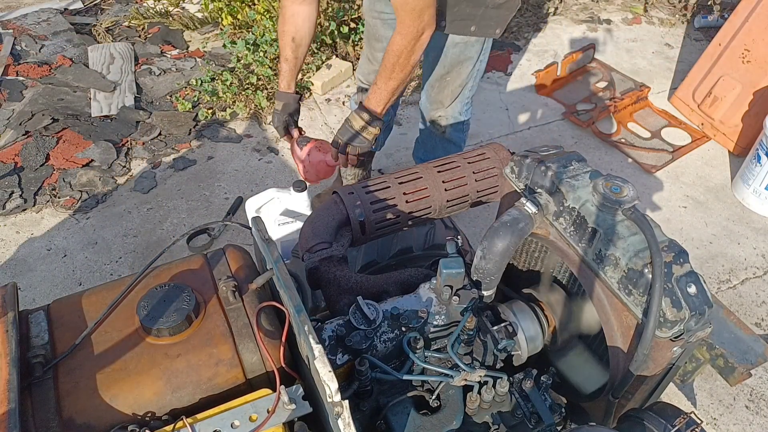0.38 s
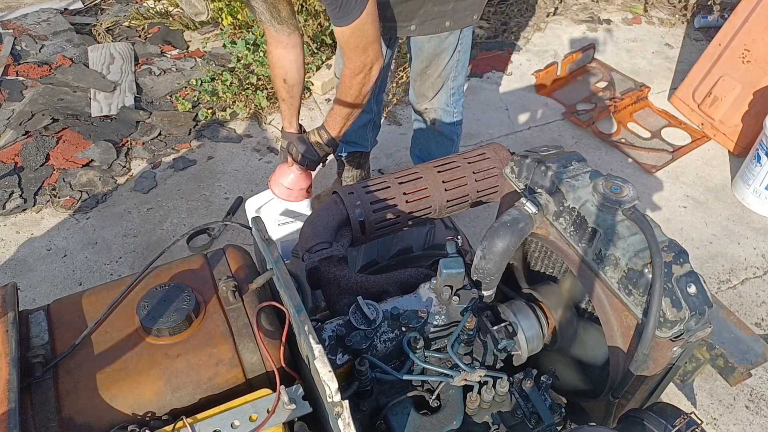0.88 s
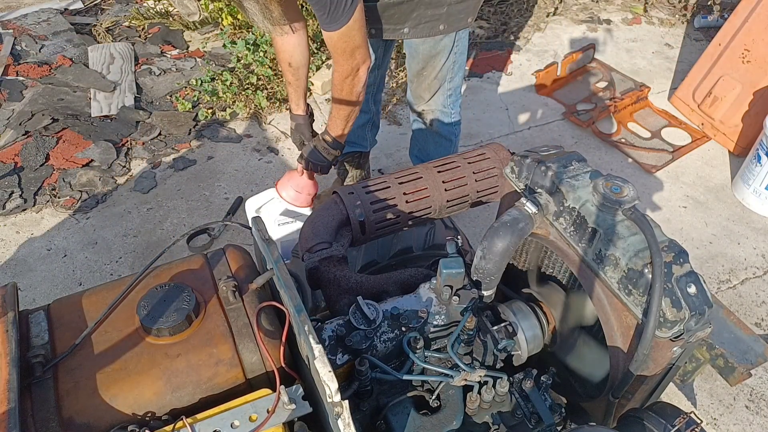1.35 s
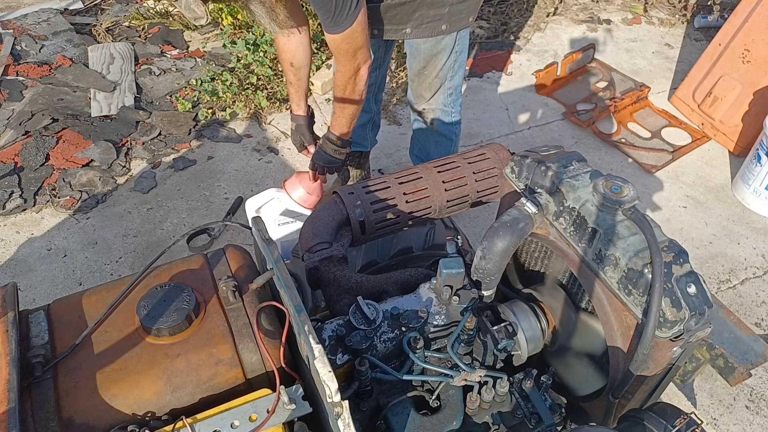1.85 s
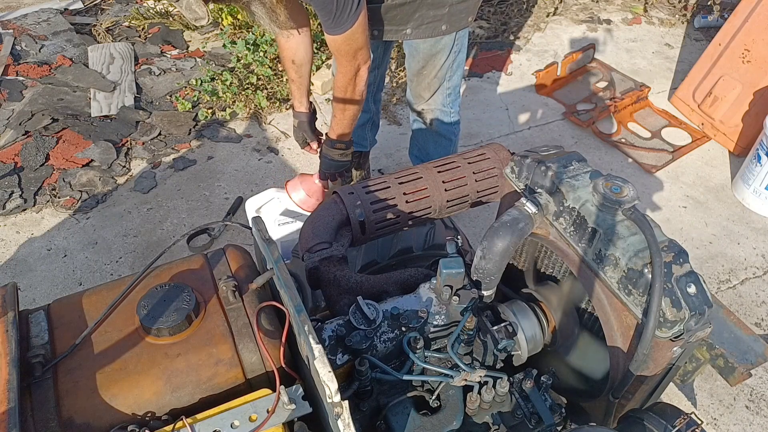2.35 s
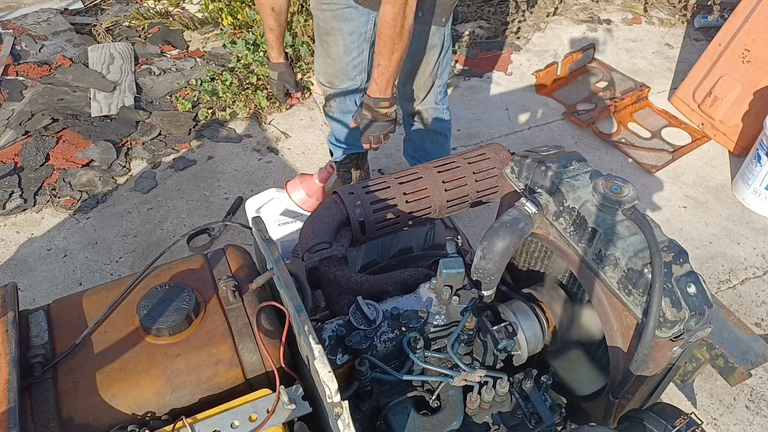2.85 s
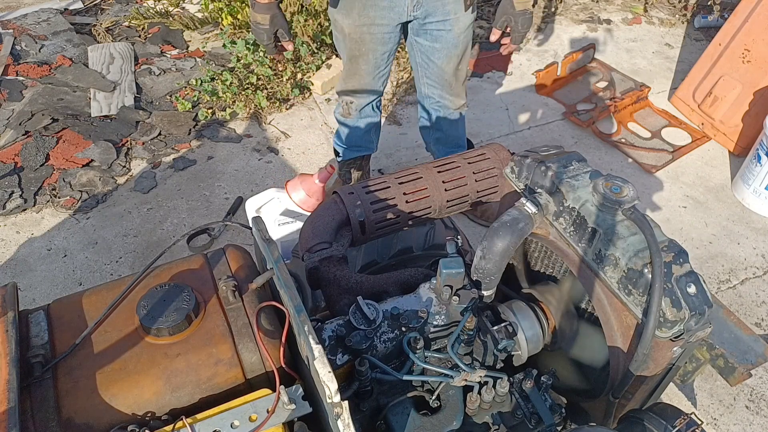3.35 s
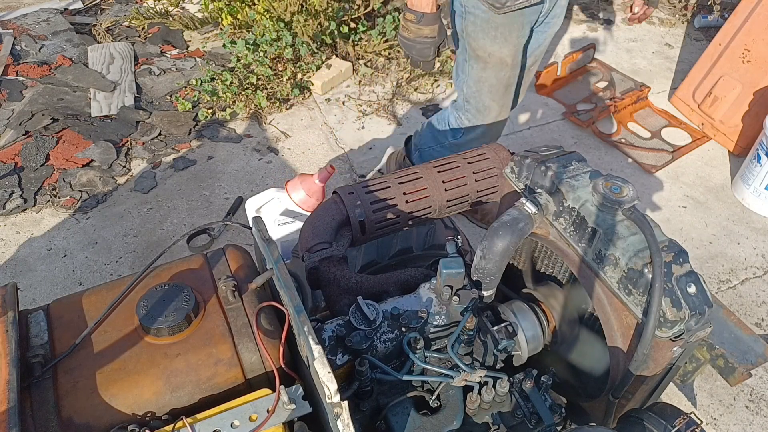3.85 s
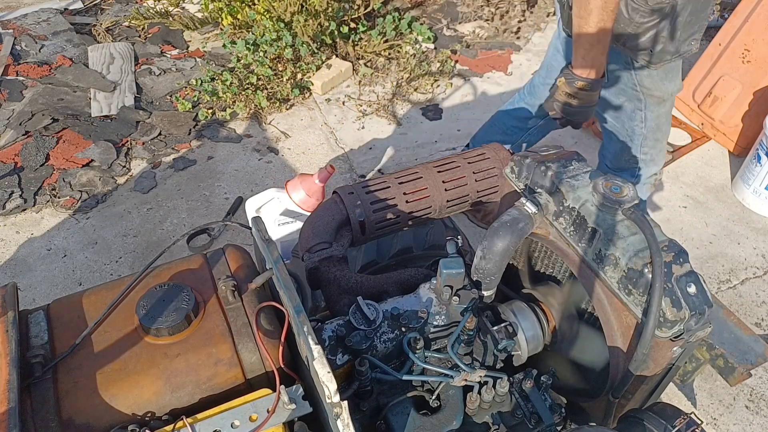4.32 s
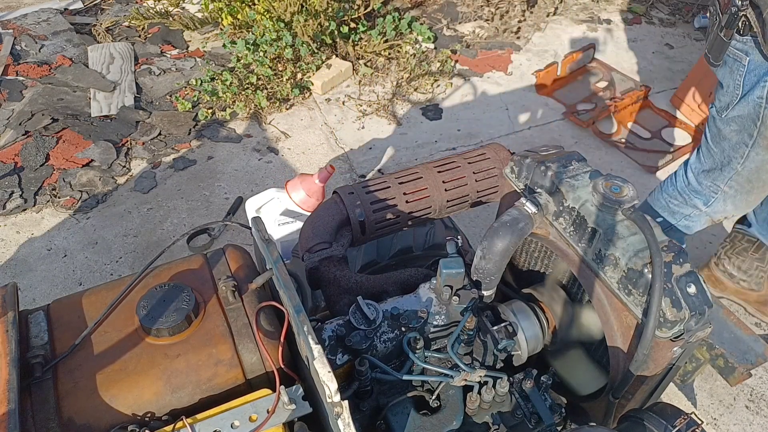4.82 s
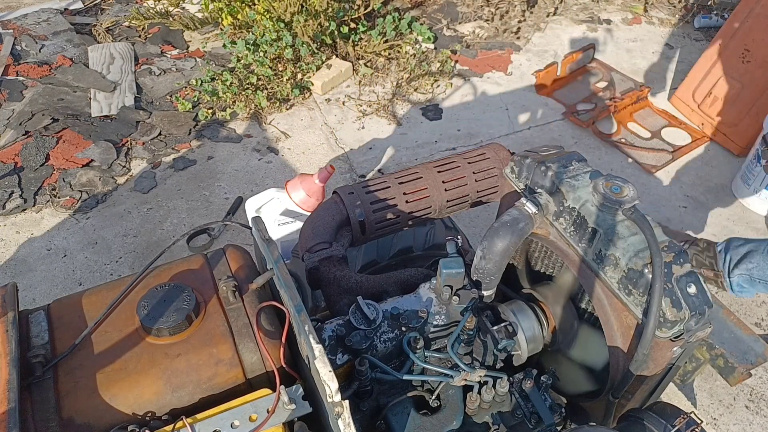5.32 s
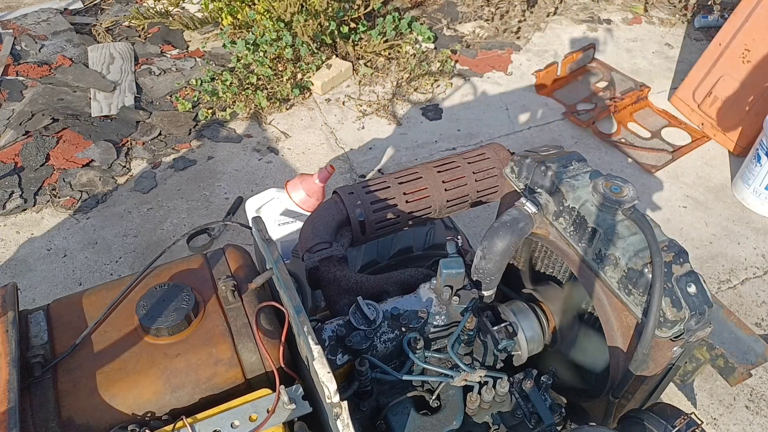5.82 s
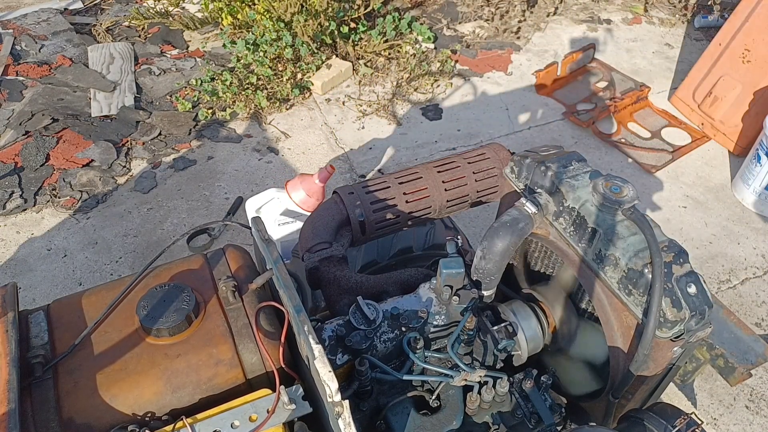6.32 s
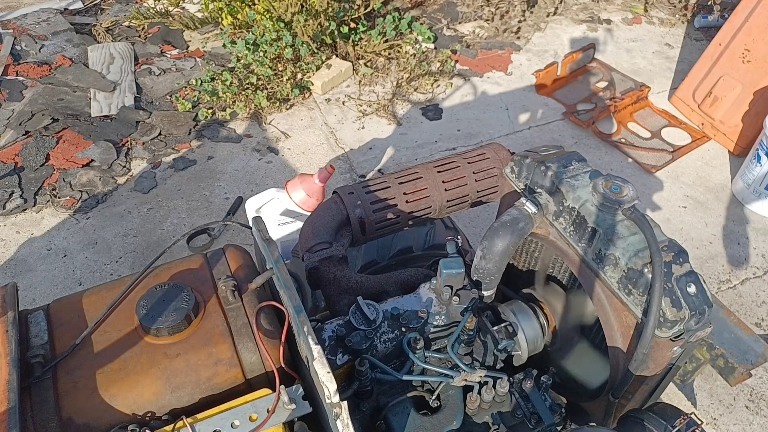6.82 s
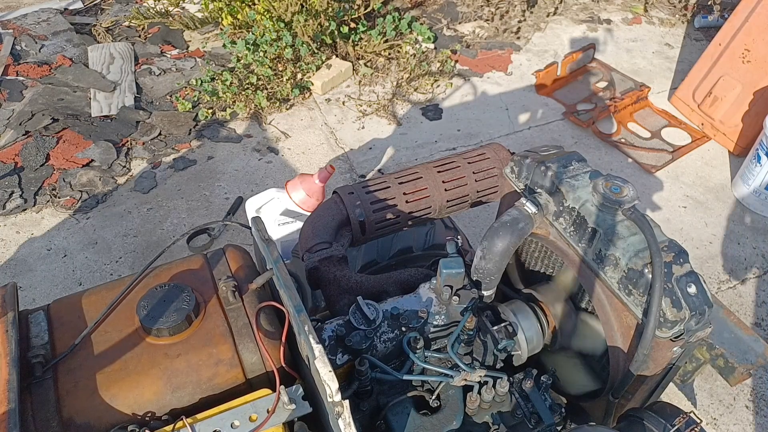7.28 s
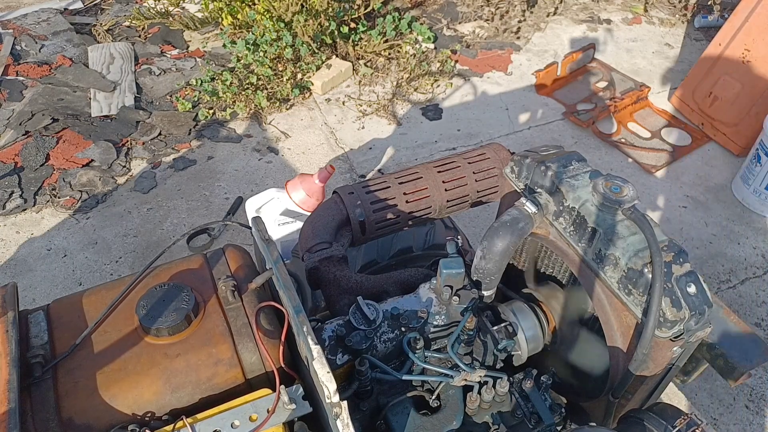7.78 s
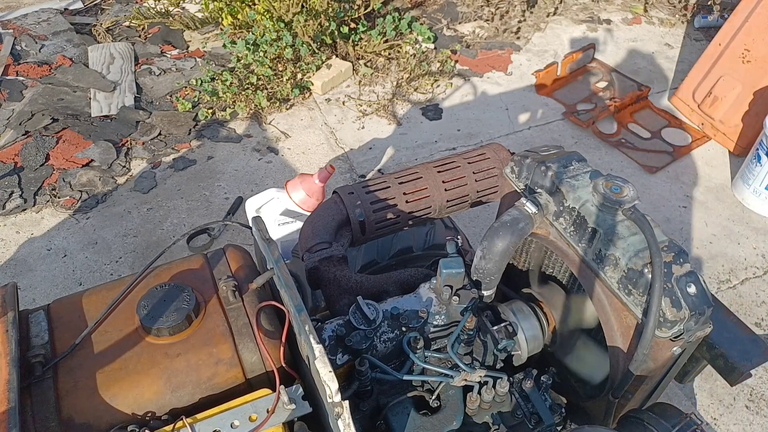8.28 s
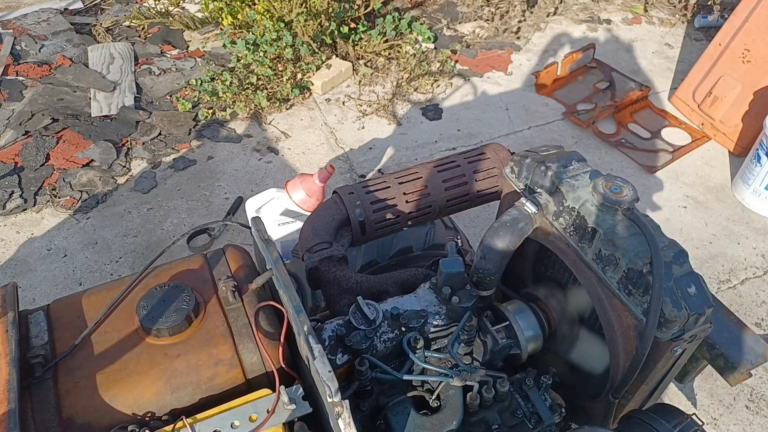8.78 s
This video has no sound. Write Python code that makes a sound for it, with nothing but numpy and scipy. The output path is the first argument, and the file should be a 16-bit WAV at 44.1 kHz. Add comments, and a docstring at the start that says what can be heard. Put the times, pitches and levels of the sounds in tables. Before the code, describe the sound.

Close outdoor pickup of an old tractor diesel ticking over at about thirty firings a second, very slowly quickening. It begins full and bright with exhaust throb and clattering valves, becomes softer and muffled after four seconds, then swells near nine with more block rattle than exhaust. Low wind gusts and a few soft microphone bumps intrude; the image is narrow, dry and nearly mono.

```python
"""Idling tractor diesel, heard on a walk

A three-cylinder engine idles in a yard while a carried microphone moves from the exhaust side, behind the
bodywork and round to the far side. Exhaust puffs are harmonics of the firing rate; combustion knocks and noise
bursts of gas, valves and gears ring the modes of the block; gears, belt and fan add thin tones. Filtered noise
gives light wind and a few brief treble bursts, short pulses give handling bumps, and a delay separates two ports."""
import sys
import numpy as np
from scipy import signal
from scipy.fft import rfft, irfft, next_fast_len
from scipy.io import wavfile
from scipy.ndimage import uniform_filter1d

SR = 44100
rng = np.random.default_rng(int(sys.argv[2]) if len(sys.argv) > 2 else 0)


def wav_out(sig):
    """Save sig, one row per channel (or a flat mono array), as 16-bit PCM at SR to the path in sys.argv[1]."""
    wavfile.write(sys.argv[1], SR, np.round(np.clip(np.atleast_2d(sig).T, -1, 1) * 32767).astype(np.int16))


def invert_db(x):
    """Field ratio 10**(x/20) for x, a level in decibels (scalar or array-like)."""
    u = np.asarray(x, float) / 20
    return 10 ** u


N = 403515
TIME = np.arange(N) / SR


def curve(table):
    """Linear interpolation: columns of a (time [s], value, ..) table at every sample."""
    s, *columns = np.transpose(table)
    return [np.interp(TIME, s, c) for c in columns]


def unit(x):
    """Normalisation to a root-mean-square of 1."""
    return x / np.sqrt(np.mean(x ** 2))


def band(x, lo_hz, hi_hz):
    """Band limiting by a steep Butterworth filter."""
    return signal.sosfilt(signal.butter(4, [lo_hz, hi_hz], "band", fs=SR, output="sos"), x)


def wander(step_s):
    """Slow random modulation: values of spread near 1, joined by straight lines every step_s."""
    knots = np.arange(0, 10, step_s)
    values = np.resize(rng.standard_normal(400), len(knots))
    return np.interp(TIME, knots, values)


# gusts on the ports: (time [s], relative peak level [dB], time to rise or fall by 20 dB [s])
GUSTS = [(.66, -36, .15), (1.96, -39, .12), (2.89, -35, .1), (3.21, -38, .1), (3.67, -24, .04),
         (3.8, -32, .1), (6.14, -29, .1), (6.7, -33, .12), (7.3, -38, .12), (7.67, -31, .08),
         (8.03, -25, .14), (8.18, -29, .12), (8.28, -23, .1), (8.42, -24, .1), (8.86, -24, .12)]


def wind():
    """Turbulent pressure as band-limited noise: a light breeze with gusts, the stronger reaching higher."""
    db = -50 + 6 * wander(.09)
    for s, peak_db, fall_s in GUSTS:
        db = np.maximum(db, peak_db - 20 * np.abs(TIME - s) / fall_s)
    deep = unit(band(rng.standard_normal(N), 4.3, 28))
    upper = unit(band(rng.standard_normal(N), 25, 143))
    return invert_db(db - 0.5) * deep + invert_db(1.6 * (db + 21.5) - 32.5) * upper


# handling bumps: (time [s], relative strength [dB], time constant of the rise [s], direction: -1 pull, 1 push)
BUMPS = [(2.89, -17, 0.004, -1), (3.67, -14, .004, -1), (8.362, -19, .006, 1), (8.383, -11, .001, 1),
         (8.39, -7, 0.0012, -1), (8.408, -16, .002, 1), (8.416, -9, 0.0015, -1), (8.428, -11, .004, 1),
         (8.812, -17, .004, 1), (8.843, -12, .003, 1), (8.858, -10, 0.006, -1)]


def bumps():
    """Displacement and relaxation: each bump moves the membrane quickly one way and lets it creep back."""
    out = np.zeros(N)
    for s, db, rise_s, way in BUMPS:
        u = np.clip(TIME - s, 0, None) / rise_s
        out += np.sign(way) * invert_db(db) * (1 - np.exp(-u)) * np.exp(-u / 7)
    return signal.lfilter(*signal.butter(1, 6, "high", fs=SR), out)


# brief wide bursts of treble noise: (time [s], level at the onset [dB rms])
TREBLE_BURSTS = [(.43, -38), (.634, -39), (.725, -36), (1.82, -40), (8.852, -33)]


def treble_bursts():
    """Band-limited noise with exponential decay: the treble fills briefly and widely."""
    out = np.zeros(N + 2000)
    t = np.arange(2000) / SR
    for s, db in TREBLE_BURSTS:
        noise = unit(band(rng.standard_normal(len(t)), 5000, 13000))
        out[int(s * SR):][:len(t)] += invert_db(db) * np.exp(-t / .004) * noise
    return out[:N]


# engine speed, on the whole creeping up; it also drives the crank in scene(): (time [s], rate [firings/s])
SPEED = [(0, 30.123), (2.8, 30.066), (3.7, 30.184), (7, 31.122), (8, 31.213), (9.16, 31.495)]
# tones of gears, belt and fan: (start [s], end [s], mean frequency [Hz], nominal level [dB rms])
TONES = [(.1, 3.2, 251, -40), (.8, 2.8, 2160, -44), (4.3, 5.5, 690, -46), (5.9, 6.4, 695, -47),
         (4.4, 5.4, 460, -47), (4.8, 5., 512, -46), (4.5, 5.3, 1015, -51), (5.55, 5.9, 1025, -42),
         (6., 6.3, 514, -47), (7.2, 7.8, 465, -48)]


def tones():
    """Periodic excitation: thin tones in proportion to engine speed, wavering, each on a part of the walk."""
    out = 0
    speed, = curve(SPEED)
    fade_s = .3
    for start, end, hz, db in TONES:
        fade = np.interp(TIME, [start - fade_s, start, end, end + fade_s], [0, 1, 1, 0])
        relative_speed = speed / np.average(speed, weights=fade)
        phase = 2 * np.pi * np.cumsum(hz * relative_speed * (1 + .001 * wander(.08))) / SR
        level = np.sqrt(2) * invert_db(db + 1.5 * wander(.12))
        out = out + level * fade * np.sin(phase)
    return out


# valve ticks that stand out and ring: (time [s], relative level [dB], frequency [Hz])
PINGS = [(0.0338, -23, 7350), (0.1341, -24, 7350), (0.2339, -22, 7330), (0.4314, -23, 5640),
         (0.632, -23, 5360), (0.831, -24, 5420), (0.9323, -25, 5430), (1.0306, -23, 5450),
         (1.3633, -24, 4800), (2.2942, -26, 6790), (2.394, -26, 6850), (3.2246, -23, 5650),
         (3.4246, -24, 5480), (3.5264, -22, 5720), (8.0222, -27, 5300), (8.1179, -24, 6250),
         (8.1494, -24, 6270), (8.1818, -21, 5610), (8.2137, -23, 5300), (8.2457, -24, 5370),
         (8.2781, -22, 7060), (8.31, -26, 7070), (8.8199, -21, 5200)]


def pings():
    """Impact and free decay: each loud valve tick mixes a ring with a scrape round its frequency."""
    out = np.zeros(N + 2000)
    t = np.arange(2000) / SR
    t60_s, half_width_hz = .035, 1400
    for s, db, hz in PINGS:
        scrape = unit(band(rng.standard_normal(len(t)), hz - half_width_hz, hz + half_width_hz))
        fade = (1 - np.exp(-t / .0006)) * np.exp(-np.log(1000) * t / t60_s)
        out[int(s * SR):][:len(t)] += invert_db(db - 6) * fade * (np.sin(2 * np.pi * hz * t) + .7 * scrape)
    return out[:N]


def strikes(crank, at):
    """Cyclic timing with jitter: samples at which the crank passes one point, a little late by chance."""
    hits = np.flatnonzero(np.diff(np.floor((crank - at) / 3)))
    late = np.abs(rng.standard_normal(len(hits)) * 0.00017 * SR).astype(int)
    return np.minimum(hits + late, N - 1)


# burns unlike their neighbours: (time [s], knock excess under 1.4 kHz [dB], knock excess above [dB])
HARD_BURNS = [(.084, 5, 2), (.152, 0, 3), (.184, 2, 0), (.285, 2, 0), (.316, 0, 2), (.35, 3, 3),
              (.384, 5, 3), (.416, 0, 6), (.483, 5, -3), (.583, 4, 1), (.616, 1, 4), (.655, 3, 1),
              (.682, 2, 3), (.717, 0, 3), (.782, 4, 6), (.882, 3, 6), (.982, 2, 1), (1.05, 4, 5),
              (1.216, 1, 5), (1.248, 1, 3), (1.28, 4, 3), (1.379, 2, 1), (1.414, 1, 4), (1.48, 4, 5),
              (1.579, 1, 1), (1.613, 0, 2), (1.679, 4, 0), (1.779, 1, 1), (1.879, 2, 2), (2.049, 3, 2),
              (2.078, 3, 4), (2.176, 3, 4), (2.476, 1, 2), (2.576, 3, 5), (2.61, 1, 4), (2.676, 1, 4),
              (2.71, 1, 4), (2.875, 1, 2), (3.11, 1, 3), (3.308, 0, 5), (3.475, 2, 0), (3.574, 0, 3),
              (3.673, 1, 3), (3.805, 0, 2), (3.839, 2, 3), (3.973, 0, 2), (4.003, 4, 4), (4.073, 0, 4),
              (4.103, 4, 5), (4.172, 0, 2), (4.201, 4, 4), (4.271, 2, 3), (4.6, 2, 4), (4.765, 4, 2),
              (4.86, 3, 3), (5.446, 2, 1), (5.641, 4, 2), (5.739, 5, 1), (5.838, 3, 2), (6.032, 2, 1),
              (6.129, 2, 3), (6.226, 2, 3), (6.42, 2, 0), (6.516, 4, 0), (6.612, 2, 2), (8.151, 3, 1),
              (8.342, 3, 0), (8.535, 3, 0), (8.599, 3, 0), (8.632, 4, 1), (8.726, 5, 4), (8.821, 5, 3),
              (8.982, 4, 5), (9.043, 2, 3)]


def harder(hits, upper):
    """Cyclic variation: excess in dB of each strike over an ordinary burn, in the lower or upper band."""
    s, *db = np.transpose(HARD_BURNS)
    same_burn = np.abs(TIME[hits, None] - s) < .012
    return same_burn @ db[upper]


KNOCK_AT = 0.2  # firings after each whole crank count
# head and liner modes: (frequency [Hz], decay time T60 [s], relative level for cylinders 1, 2, 3 [dB each])
KNOCK_MODES = [(510, .035, -9, -6, 4), (700, .045, -8, 3.5, -9), (1150, .065, -9, 6, -8),
               (1700, .045, 4, 6, 5), (1810, .035, 4, 2, 8), (1980, .04, 6, 3, 2), (2150, .07, 2, 5, -1),
               (2600, .035, 2, 5, 0), (2830, .04, 3, 3, 11), (980, .009, -6, 7, -6), (2380, .02, 0, 8, 1),
               (3060, .045, 6, 2, 7.5)]
# how openly the knocks reach the microphone: (time [s], relative level [dB])
KNOCK_REACH = [(0, 1.5), (3.4, -1), (4.2, 1), (4.9, -3.5), (5.7, -.5), (6.8, -1), (7.4, -5), (9.15, -3.5)]
# narrow beams of the lowest modes: (mode 0-2, level inside [dB], time of crossing [s], half width [s])
BEAMS = [(0, 5.5, 3.95, .4), (1, 3.5, 5.7, .6), (2, 5, 6.5, .5), (2, 1, 1.4, 1.5), (2, 2.5, 8.6, .7),
         (0, 5, 9., .3)]
# level of the three lowest modes outside their beams: one value per mode [dB]
OFF_BEAM_DB = [-2, -4, -3]


def knocks(crank):
    """Modal excitation: each burn strikes the same modes with a force and shares of its own."""
    hits = [strikes(crank, c + KNOCK_AT) for c in range(3)]
    force_db = [1.8 * rng.standard_normal(len(h)) for h in hits]
    beam_db = []
    for m, off_db in enumerate(OFF_BEAM_DB):
        db = np.full(N, float(off_db))
        for mode, on_db, s, half_s in BEAMS:
            if mode == m:
                db += (on_db - off_db) * np.exp(-((TIME - s) / half_s) ** 2)
        beam_db.append(db)
    out = 0
    for m, (hz, t60_s, *cylinder_db) in enumerate(KNOCK_MODES):
        push = np.zeros(N, complex)
        for h, force, db in zip(hits, force_db, cylinder_db):
            # the higher the mode, up to a limit, the more its share varies
            chance = rng.standard_normal((len(h), 2))
            push_db = db + force + harder(h, int(hz > 1400)) + min(hz / 800, 1.6) * chance[:, 0]
            push[h] = invert_db(push_db) * np.exp(.7j * chance[:, 1])
        # gas temperature shifts the mode a little from burn to burn
        shift = 1 + .015 * np.interp(crank, np.arange(300), rng.standard_normal(300))
        turn = np.exp(2j * np.pi * np.cumsum(hz * shift) / SR)
        decay = np.exp(-np.log(1000) / (t60_s * SR))
        swell = signal.lfilter([1], [1, -decay], push * np.conj(turn))
        # the pressure rises within about a millisecond
        soft = signal.lfilter([.06], [1, -.94], swell)
        beam = invert_db(beam_db[m]) if m < len(beam_db) else 1
        out = out + beam * (soft * turn).imag
    reach_db, = curve(KNOCK_REACH)
    return out * invert_db(reach_db)


def blows(crank, rows, scatter_db, decay_s, burns=None):
    """Impulsive energy with exponential decay: envelope of uneven blows that return every engine cycle."""
    train = np.zeros(N)
    for at, db in rows:
        hits = strikes(crank, at)
        hit_db = scatter_db * rng.standard_normal(len(hits)) + np.broadcast_to(db, N)[hits]
        if burns is not None:
            hit_db = hit_db + harder(hits, burns) / 2  # the gas noise takes half the excess in dB
        train[hits] += invert_db(hit_db) ** 2
    power = signal.lfilter([1], [1, -np.exp(-2 / (decay_s * SR))], train)
    return np.sqrt(1 + uniform_filter1d(power, size=40, origin=19))


# broad colour of the block: (frequency [Hz], level from the exhaust side, from behind, from the far side [dB])
BLOCK_COLOUR = [(40, -9, -11, 4), (120, -9.5, -4, -2.5), (300, -5.5, -5, -4.5), (630, -4, -5.5, -7),
                (800, -3, -3.5, -6), (1510, -9, -10, -5), (1850, -2, 1.5, 2), (2220, -3, -4, -4.5),
                (3120, -6, -6, -5.5), (3280, -12, -10, -9), (3800, -11.5, -11, -10.5),
                (5100, -19, -18, -15.5), (8340, -22, -22.5, -15), (9970, -27, -37, -26),
                (12540, -34, -39, -31), (14900, -44, -61, -37), (20000, -62, -72, -52)]
# modes of block, sump and panels: (frequency [Hz], width [Hz], lift over the colour from the same faces [dB])
PANEL_MODES = [(261, 70, 7.5, 5, 2), (440, 75, 1, 1.5, 7.5), (515, 60, 5.5, 2, 2), (695, 60, 0, 3.5, 0),
               (755, 50, 4, 1, 0), (1030, 60, -1.5, 1.5, 5), (866, 90, 1, 1, 5), (1127, 85, 2.5, 2, 4.5),
               (1273, 20, 8, -3, -5.5), (1735, 440, 7.5, 2.5, -2), (1920, 220, -2, 5, -1.5),
               (2160, 13, 8, -2.5, 1.5), (2606, 120, 1, 5, 10), (2790, 69, 7.5, 7, 7),
               (3040, 160, 1.5, 1.5, 0), (4380, 120, 4, 2, 0), (4480, 310, 3, 4.5, -1),
               (5010, 150, 1.5, 5, 5), (5510, 110, 3, 4, 6)]


def ring(x, face):
    """Minimum-phase resonance: causal response of the block from one face, broad colour plus modes."""
    hz = np.arange(2049) * SR / 4096 + 1
    colour = np.transpose(BLOCK_COLOUR)
    db = np.interp(np.log(hz), np.log(colour[0]), colour[1 + face])
    for f, width_hz, *lift_db in PANEL_MODES:
        db = db + lift_db[face] / (1 + (2 * (hz - f) / width_hz) ** 2)
    # folding the cepstrum makes the response causal
    cepstrum = irfft(np.log(invert_db(db)))
    cepstrum[1:2048] *= 2
    cepstrum[2049:] = 0
    return signal.fftconvolve(x, irfft(np.exp(rfft(cepstrum))))[:N]


# the walk: (time [s], relative block level [dB], relative upper knock band [dB], relative treble [dB])
WALK = [(0, -26, -6, -4.5), (.4, -27, 1, -4.5), (.9, -26, -4, -6.5), (1.75, -26, -4.5, -7),
        (2.5, -26, -2.5, -8), (3.15, -26, -6, -6.5), (3.6, -29, -5, -5.5), (4.2, -33, -14, -9.5),
        (4.6, -35, -17, -13), (4.95, -33, -13.5, -16), (5.4, -33, -15, -12), (5.95, -32, -13.5, -11),
        (6.6, -33, -19.5, -14), (7.2, -31, -15, -10.5), (7.7, -31, -13.5, -10.5), (8.4, -28, -12, -9.5),
        (8.75, -24.6, -12.5, -9.5), (9.15, -24.5, -15.5, -11.5)]
# (time [s], face heard: 0 exhaust side, 1 behind, 2 far side; lead of the block's sound [firings])
FACE = [(0, 0., 0.), (3.4, 0.011, 0.00098), (4.5, .95, .02), (5.5, 1.01, .05), (6.7, 1.05, .09),
        (7.6, 1.57, .14), (8.4, 1.805, 0.16), (9.15, 1.95, .15)]
# relative level of the knock band from the exhaust side, from behind, from the far side [dB each]
KNOCK_BAND_DB = [1.8, -2.8, 1.]
# gas noise of the burn over the steady clatter, a row per cylinder: (level under 1.4 kHz [dB], above [dB])
GAS_NOISE = [(0.5, 4), (1.5, 4.), (-5, 3.5)]
# valve and injector ticks: (place in the cycle [firings], level over the steady clatter up to behind the
# bodywork [dB], the same on the far side [dB])
TICKS = [(.23, 6, 9), (.75, 8, 5), (1.23, 3.5, 9), (1.76, 8, 5.5), (2.24, 3, 9), (2.62, 4, 4),
         (2.75, 8, 6.5)]


def block(crank):
    """Forced vibration: knocks and partly cyclic clatter, lifted by burns and ticks, ring the block."""
    level_db, upper_db, treble_db = curve(WALK)
    face, early = curve(FACE)
    crank = crank + early
    knock_db = np.interp(face, [0, 1, 2], KNOCK_BAND_DB)

    # the repeating part changes slowly from one pattern to the next
    patterns = rng.standard_normal((8, 4390))
    angle = (crank % 3 / 3 * 4390).astype(int)
    drift = TIME / 1.4
    step = drift.astype(int)
    blend = np.pi / 2 * (drift - step)
    repeat = np.cos(blend) * patterns[step, angle] + np.sin(blend) * patterns[step + 1, angle]
    fresh = rng.standard_normal(N)
    low, mid, high = (np.sqrt(share) * repeat + np.sqrt(1 - share) * fresh for share in (.7, .45, .05))

    low_burns = [(c + KNOCK_AT, db[0]) for c, db in enumerate(GAS_NOISE)]
    mid_burns = [(c + KNOCK_AT, db[1]) for c, db in enumerate(GAS_NOISE)]
    low = low * blows(crank, low_burns, 0.7, 0.025, burns=0)
    mid = mid * blows(crank, mid_burns, 1., .011, burns=1)
    # a tick is not equally strong in the lower, upper and top treble
    ticks = [(at, np.interp(face, [1, 2], db)) for at, *db in TICKS]
    top = high * blows(crank, ticks, 2.2, .009)
    air = high * blows(crank, ticks, 2.2, .009)
    high = high * blows(crank, ticks, 1.8, .009)

    knock = invert_db(-11) * knocks(crank)
    treble = band(high + knock, 3300, 6500) + band(top, 6500, 10000) + band(air, 10000, 19000)
    drive = band(low + knock, 33, 1455)
    drive = drive + band(mid + knock, 1368, 2243) * invert_db(knock_db - 3.5)
    drive = drive + band(mid + knock, 2300, 3300) * invert_db(upper_db - 1.5)
    drive = drive + treble * invert_db(treble_db + 4)
    # crossfade between the responses of neighbouring faces
    heard = sum(np.sqrt(np.clip(1 - np.abs(face - k), 0, 1)) * ring(drive, k) for k in range(3))
    return heard * invert_db(level_db + 12.7)


# exhaust tone: (multiple of the firing rate, nominal level at each of the seven stops of the walk [dB rms])
EXHAUST = [(1, -27, -27.5, -28, -30, -29.5, -30, -28), (2, -28, -30.5, -29, -33.5, -35, -34, -34.5),
           (3, -24.5, -24, -26, -30.5, -35.5, -35, -35), (4, -27, -29, -28, -34.5, -38.5, -43, -39),
           (5, -26, -29.5, -27, -39, -42.5, -48, -41.5), (6, -31.5, -36.5, -31.5, -38, -45, -40, -35),
           (7, -35, -36, -35, -50, -54, -47, -41), (8, -36, -36, -37, -43, -57, -45.5, -39.5),
           (9, -35, -36.5, -35, -44, -48, -49, -44), (12, -59, -58, -55, -58, -60, -44, -46)]
# the seven stops of the walk: time [s]
STOPS_S = [.3, 1.8, 3.3, 4.8, 6.1, 7.3, 8.7]
# lead of the puff over the rocking block at each stop [firings]
PUFF_EARLY = [.03, .012, .008, .034, .032, .085, .117]


def exhaust(crank):
    """Harmonic synthesis: puffs as phase-aligned multiples of the firing rate, no two quite equal."""
    size = invert_db(0.3 * np.interp(crank, np.arange(300), rng.standard_normal(300)))
    puff = crank + np.interp(TIME, STOPS_S, PUFF_EARLY)
    near = np.interp(TIME, STOPS_S[2:4], [1, 0])
    far = np.interp(TIME, STOPS_S[4:6], [0, 1])
    out = 0
    for k, *db in EXHAUST:
        # close by, the silencer chamber holds back the multiples round its resonance
        held = near * np.exp(-((k - 6.2) / 1.3) ** 2)
        # on the far side the puff comes round the bodywork and its middle multiples arrive late
        held = held + 3.3 * far * np.exp(-((k - 5.5) / 1.3) ** 2)
        if k == 1:  # comes from the rocking block and trails the puff
            wave = np.cos(2 * np.pi * crank - .9)
        else:
            wave = size * np.cos(2 * np.pi * k * puff + .9 - held)
        out = out + np.sqrt(2) * wave * invert_db(np.interp(TIME, STOPS_S, db) + .7 * wander(.1))
    return out


def scene():
    """Superposition and propagation delay: the summed sound reaches the left port after the right."""
    speed, = curve(SPEED)
    crank = 1.684 + np.cumsum(speed) / SR  # in firings; three make an engine cycle
    sound = wind() + bumps() + treble_bursts() + tones() + pings() + block(crank) + exhaust(crank)
    lag = 6.9  # samples: the ports lie a few centimetres apart
    size = next_fast_len(N + 64)
    # a linear phase delays by a fraction of a sample
    delay = np.exp(-2j * np.pi * lag * np.arange(size // 2 + 1) / size)
    late = irfft(rfft(sound, size) * delay, size)[:N]
    return np.array([late, sound])


def roll_off(x):
    """The treble ends steeply here."""
    return signal.sosfilt(signal.butter(12, 15630, fs=SR, output="sos"), x)


# start and end of the instant in which the sound drops out: time [s]
GAP_S = (4.6115, 4.6185)


def record(dry):
    """Amplitude gating: the sound drops out for an instant."""
    gap = (TIME > GAP_S[0]) & (TIME < GAP_S[1])
    gain = uniform_filter1d(np.where(gap, .04, 1.), size=40)
    return roll_off(dry * gain)


dry = scene()
out = record(dry)
wav_out(out)
```